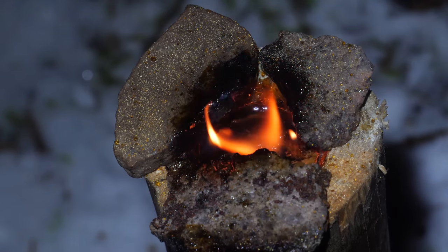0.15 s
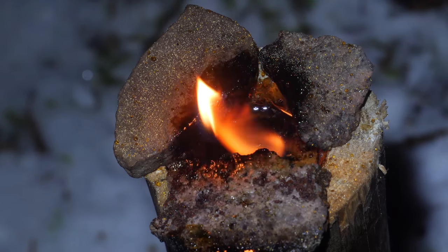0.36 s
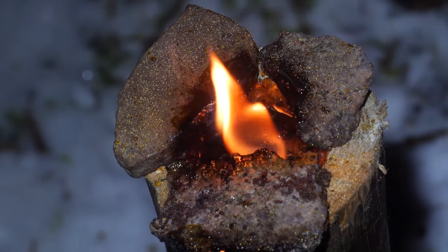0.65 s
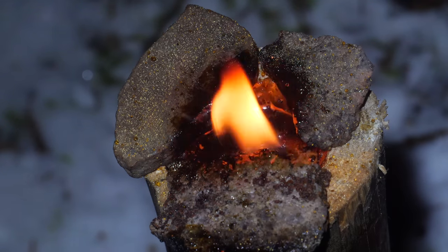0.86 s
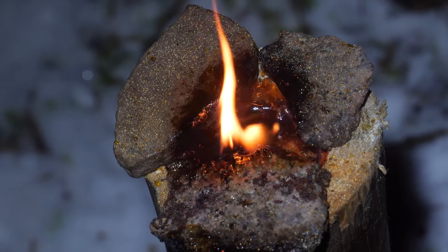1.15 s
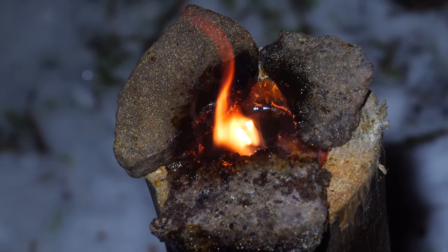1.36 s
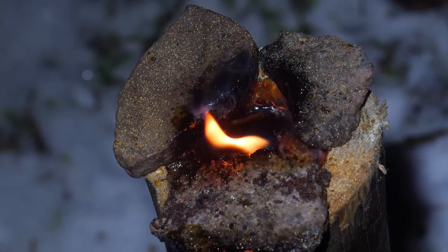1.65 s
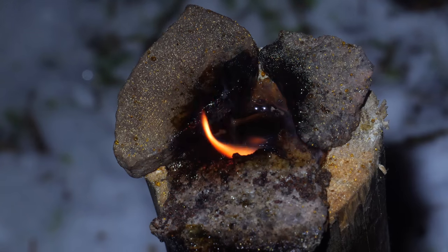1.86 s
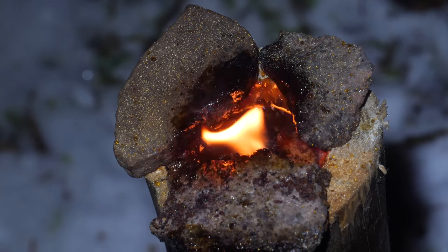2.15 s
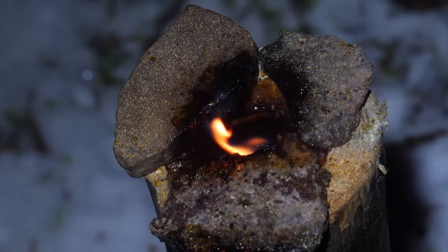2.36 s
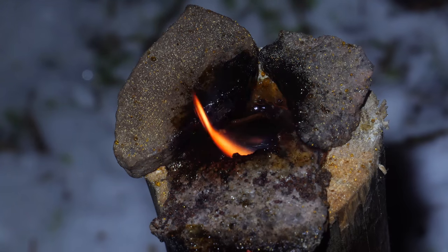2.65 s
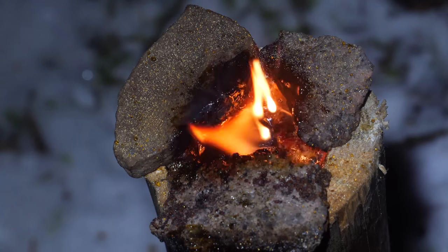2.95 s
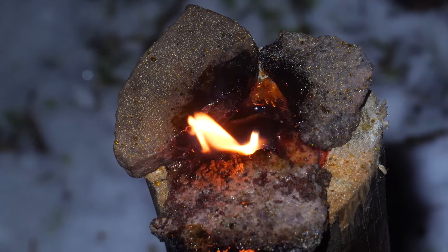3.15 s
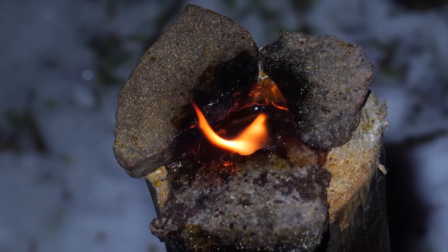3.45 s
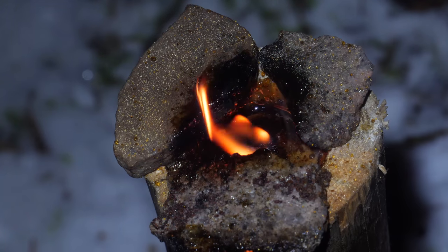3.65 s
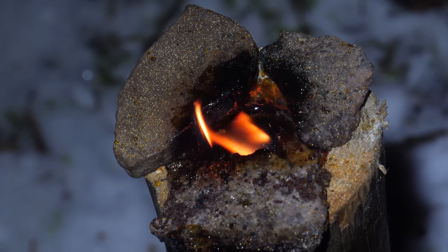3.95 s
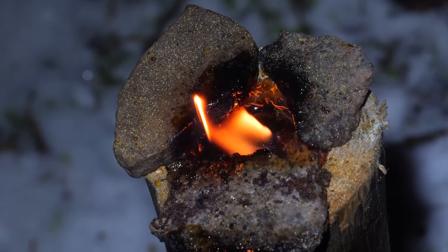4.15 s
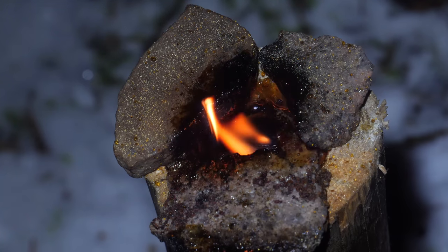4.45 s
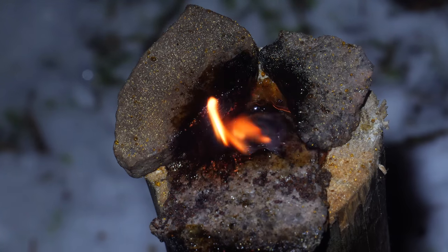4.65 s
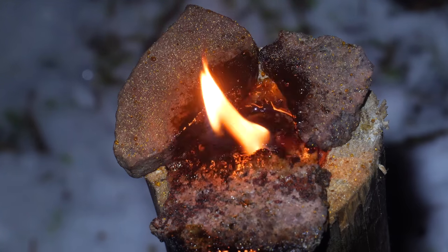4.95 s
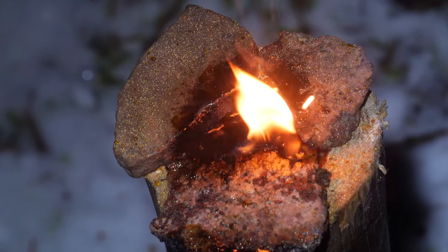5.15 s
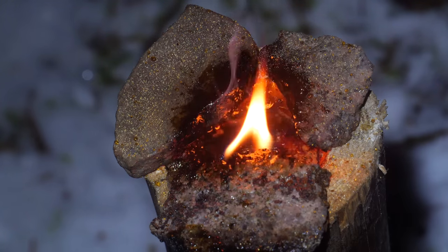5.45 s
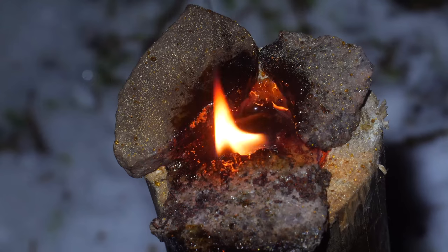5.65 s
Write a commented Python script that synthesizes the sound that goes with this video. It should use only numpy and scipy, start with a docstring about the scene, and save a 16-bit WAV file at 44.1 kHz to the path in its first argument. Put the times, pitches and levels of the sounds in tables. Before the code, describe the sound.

Quiet, dry crackles and sharp little pops from burning resin on a log, twice thickening into a brief sizzling flurry.

```python
"""A still, snowy forest; the microphone is close to a small flame boiling resin among stones on a log.
From the start, tiny bursts sizzle over faint air and a far hum, and gas pockets burst as sharp pops,
each thrown back by stones, log and ground within about 6 ms. From 0.5 s the flame puffs now and then.
Near 1 s the resin boils over amid a flurry of pops, then calms. The hum is strongest around 3 s.
Just after 5 s comes a second flurry with a softer, longer spurt, while the hum fades."""
import sys
import numpy as np
from scipy import signal
from scipy.fft import rfft, irfft
from scipy.io import wavfile

SR = 44100
rng = np.random.default_rng(int(sys.argv[2]) if len(sys.argv) > 2 else 0)


def dump_mix(stems):
    """Bounce the given channels to the path in sys.argv[1] as a 16-bit WAV at rate SR."""
    frames = np.atleast_2d(stems).T  # one column per channel
    limited = np.clip(frames, -1, 1)  # hard clip at full scale
    pcm = np.round(limited * 32767).astype(np.int16)
    wavfile.write(sys.argv[1], SR, pcm)


N = 256662

# Colour of still air and microphone hiss: (frequency [Hz], relative level [dB])
AIR_SPECTRUM = [(20, -3.5), (50, 0.5), (120, -1), (210, 4), (330, -5), (900, -13.5), (2000, -18.5),
                (4000, -24.5), (9000, -24), (14500, -19.5), (16500, -29)]
# Swell of the far hum: (time [s], level [dB])
HUM_LEVELS = [(0, -86), (1.3, -87.5), (1.7, -83), (3.1, -78), (3.6, -97), (4.3, -82.5), (5.82, -101.5)]
# Colour of one bursting gas pocket: (frequency [Hz], relative level [dB])
BURST_SPECTRUM = [(100, -30.5), (300, -14.5), (1000, 1.5), (2000, 3), (3000, 11.5), (4000, 14), (6000, 12),
                  (7500, 11.5), (9000, -1.5), (10500, 0), (13000, -10), (16500, -14.5)]
# The resin boils over: (start [s], sizzle level at the source [dB], length [s])
BOIL_OVERS = [(0.937, -38, 0.06), (5.074, -50, 0.19)]
# Bounces off log, stones and ground: (delay [ms], signed gain [ratio])
NEAR_ECHOES = [(.59, .04), (.76, .08), (1.04, .09), (1.13, .05), (1.38, -.05), (1.68, -.09), (1.95, -.07),
               (2.74, -.055), (2.93, .1), (3.29, .045), (3.76, .04), (4.01, .035), (4.44, -.075),
               (4.65, -.045), (5.17, .05), (5.4, .08), (5.69, -.025), (6.17, -.025)]
# Ringing air between the stones: (frequency [Hz], resonance gain [dB], time to fall 60 dB [s])
HOLLOW_MODES = [(466, 4.5, 0.015), (1091, 0, 0.032), (1642, 2.5, 0.014)]
# Larger gas pockets: (time [s], body level at the source [dB], thump re body [dB], tick re body [dB])
GAS_POPS = [(0.039, -24.0, -12.5, -21), (0.0473, -38.5, -14, -20), (0.0509, -38.5, -22, -14),
            (0.0847, -32, -17.5, -31), (0.1099, -40.5, -15, -19), (0.1254, -40.0, -13.5, -9),
            (0.1821, -33.0, -18, -19), (0.2503, -49, -12, -38), (0.278, -43.5, -14, -12),
            (0.28, -45.0, -19, -10), (0.2911, -41.5, -19, -16), (0.3016, -24, -19, -15.5),
            (0.3851, -38.5, -18, -26), (0.397, -47, -14, -17), (0.4008, -38, -14, -26),
            (0.4616, -31.0, -17, -15.5), (0.4867, -36, -21, -15), (0.5057, -44.5, -9, -17),
            (0.5384, -40.0, -13, -13), (0.5921, -15, -19, -15), (0.6058, -39.5, -10, -16),
            (0.6599, -39.5, -17, -15), (0.667, -42.5, -9, -24), (0.7027, -30.5, -19.5, -15.5),
            (0.7372, -37.5, -11.5, -18), (0.8419, -49.5, -22, -23), (0.8687, -46.5, -12.5, -13),
            (0.89, -46.5, -21, -24), (0.9212, -38.5, -2.5, -34), (0.9337, -29.5, -11, -18),
            (0.9476, -23.5, -21, -15), (0.9514, -24.5, -12.5, -18), (0.9564, -18, -17, -17),
            (0.9598, -20, -12.5, -12), (0.9699, -15.0, -12.5, -16), (0.9965, -35, -6, -17),
            (1.0097, -48.0, -17, -7), (1.0133, -55, -21, -7), (1.0284, -50, -22, -34),
            (1.0363, -44, -28, -16), (1.0483, -49, -22, -13), (1.0519, -22.5, -13, -34),
            (1.0539, -31.5, -19, -13), (1.0593, -20, -16.5, -14.5), (1.0626, -29.5, -18, -17),
            (1.084, -37, -28, -18), (1.0922, -25, -16, -34), (1.1029, -18.5, -15.5, -15),
            (1.118, -31, -15, -30), (1.1254, -30.0, -20, -31), (1.1375, -31.5, -22, -15),
            (1.1538, -42.0, -16, -13), (1.1596, -17.5, -15, -30), (1.1854, -37, -17, -7),
            (1.193, -37.5, -6, -19), (1.2142, -17.5, -22.5, -33), (1.238, -45, -20, -6),
            (1.2425, -36.5, -7, -18), (1.2539, -47.0, -13, -15), (1.2594, -43, -9, -14),
            (1.268, -49, -8, -9), (1.2924, -35.5, -16, -13), (1.3096, -46, -18, -8),
            (1.3208, -40, -19, -20), (1.3287, -37.0, -21, -14), (1.336, -42, -20, -10),
            (1.3755, -37.5, -11.5, -19), (1.382, -46, -19, -15), (1.3888, -27.5, -17, -6),
            (1.4162, -32.5, -16.5, -20), (1.4534, -40, -24, -12), (1.464, -47, -18, -1),
            (1.4693, -39, -11.5, -11), (1.521, -30.5, -20, -13), (1.5488, -27, -21, -16),
            (1.5768, -38.5, -12.5, -40), (1.608, -47, -26, -12), (1.6341, -47, -22, -21),
            (1.6497, -45.5, -14, -29), (1.6763, -42.0, -23, -27), (1.6902, -22.5, -20, -31),
            (1.7138, -29.5, -23, -20), (1.7776, -44.5, -13, -15), (1.8816, -43.5, -28, -13),
            (1.9161, -45, -21, -8.5), (2.041, -47.5, -19, -7), (2.1084, -28.5, -18, -35),
            (2.1971, -45.5, -11, -13), (2.229, -49, -20, -16), (2.2633, -39.5, -20, -9.5),
            (2.2761, -39.5, -12.5, -13), (2.3172, -32.0, -21.5, -14), (2.362, -43.5, -14.5, -13),
            (2.458, -33.5, -20, -18), (2.5544, -34.0, -19.5, -12.5), (2.6058, -48, -19, -12),
            (2.628, -45.5, -13, -25), (2.6789, -23.5, -20.5, -27), (2.7323, -32.5, -19, -7.5),
            (2.7407, -46, -29, -5), (2.7713, -37.5, -18.5, -15), (2.9298, -40, -32, -18),
            (2.9633, -31.5, -16, -13), (2.9708, -21.0, -22, -14.5), (3.0073, -26, -12.5, -13),
            (3.0651, -33, -17, -18), (3.091, -47.5, -19, -24), (3.1012, -41, -14, -14),
            (3.112, -43.5, -1, -22), (3.1561, -21.5, -18.5, -22), (3.172, -36, -10, -22),
            (3.1785, -43.5, -15, -18), (3.1824, -41, -13, -25), (3.2028, -38.5, -18, -17),
            (3.2075, -25, -18, -24), (3.2369, -31, -16.5, -17), (3.2943, -39, -24, -19),
            (3.4446, -44.5, -21, -12), (3.4496, -29, -19, -16), (3.4639, -40, -16, -9),
            (3.4663, -26, -22.5, -12), (3.4713, -23.0, -15, -17), (3.4843, -34.5, -18, -5),
            (3.525, -42, -12.5, -20), (3.6071, -38.5, -17, -11), (3.6313, -39, -17.5, -13),
            (3.6892, -36, -15, -16), (3.7452, -49.5, -15, -13), (3.757, -38.5, -33, -22),
            (3.7965, -48.5, -22, -7), (3.8578, -39.5, -28, -26), (3.8814, -28, -13.5, -39),
            (3.8938, -39, -16, -26), (3.9796, -46.5, -17, -24), (3.9936, -27.5, -15, -16),
            (4.0096, -35.0, -16, -20), (4.0204, -42, -14, -13), (4.0699, -48.5, 1, -41),
            (4.1133, -43, -22, -9), (4.1243, -34.5, -12.5, -22), (4.1518, -41.5, -7.5, -38),
            (4.1687, -24.5, -10, -31), (4.2222, -28.5, -16, -17.5), (4.3381, -25.0, -22, -17),
            (4.4897, -30.5, -10.5, -32), (4.5136, -38.5, -8.5, -6.5), (4.6718, -40.5, -9, -38),
            (4.6748, -19.5, -11.5, -20), (4.7031, -39, -20, -5), (4.7071, -44, -14, -16),
            (4.7121, -44, -13, -6), (4.7594, -47, -9, -12), (4.7954, -39, -6, -11.5),
            (4.7984, -39.5, -28, -24), (4.8288, -26, -11.5, -50), (4.8488, -36.5, -15, -8.5),
            (4.8546, -31, -12, -31), (4.865, -39.5, -9, -16), (4.943, -42, -19, -32),
            (4.9559, -29, -8.5, -26), (4.9779, -29, -17, -27), (4.9871, -37, -16, -18),
            (4.9938, -30, -16, -19), (4.9987, -28.5, -24, -27), (5.0194, -35.5, -6.5, -19),
            (5.034, -37, -17, -17), (5.048, -36.5, -12.5, -17), (5.0829, -16.5, -14.5, -28),
            (5.0934, -21.5, -11, -14), (5.1019, -32, -5, -12), (5.1051, -39, -10, -26),
            (5.1093, -37, -7, -24), (5.1137, -18.5, -13, -29.5), (5.1267, -15.5, -14, -14),
            (5.1422, -25.0, -14, -20), (5.145, -37, -16, -24), (5.1519, -15.5, -10.5, -16.5),
            (5.1668, -36, -4, 5), (5.1673, -23.0, -9, -22), (5.1714, -27, -11, -18), (5.1839, -29, -11, -8),
            (5.1977, -28, -15, -21), (5.202, -35.0, -12, -5), (5.2093, -23.5, -15.5, -11),
            (5.2173, -32.5, -15, -24), (5.2213, -28.5, -15, -24), (5.2384, -46, -5, 5),
            (5.25, -37.5, -12, -25), (5.2521, -46, 2, -4), (5.2555, -33.5, -14, -6),
            (5.272, -46.0, -22, -19), (5.2886, -38, -19, -21), (5.2986, -34, -13, -22),
            (5.3018, -31.0, -12, -13), (5.3156, -28.0, -13, -24), (5.3348, -43, -17, -27),
            (5.3464, -47, -14, -14), (5.3716, -25.5, -16, -37), (5.38, -24.0, -16.5, -13.5),
            (5.3961, -47, -15, -28), (5.4009, -50, -13, -29), (5.411, -34, -17, -9),
            (5.4319, -38, -18, -24), (5.4586, -45, -14, -15), (5.4627, -47, -11, -20),
            (5.4738, -50, -28, -11), (5.4765, -41.5, -17, -15), (5.4994, -32.5, -19.5, -12.5),
            (5.5449, -45.5, -11, -28), (5.5829, -31.5, -18.5, -9), (5.5906, -29, -17.5, -23),
            (5.6407, -40.0, -18, -18), (5.743, -25.5, -16.5, -15.5), (5.783, -43, -21, -12),
            (5.8005, -31.5, -15.5, -27), (5.8112, -37.0, -23, -42)]
# Puffs and spits of gas: (time [s], peak level [dB], pitch [Hz], length [s])
GAS_PUFFS = [(.54, -56.5, 980, 0.0074), (0.594, -54, 109, 0.014), (0.92, -47.5, 390, 0.003),
             (0.964, -48, 110, 0.022), (0.982, -50.5, 422, 0.017), (1.16, -55, 503, 0.033),
             (1.157, -36, 1720, 0.0057), (1.19, -52, 500, 0.013), (1.964, -62, 75, 0.017),
             (1.965, -69, 520, 0.013), (2.434, -55.5, 91, 0.0076), (3.041, -55, 132, 0.0075),
             (3.112, -42, 1560, 0.0034), (3.179, -55, 950, 0.0066), (3.447, -56, 388, 0.01),
             (3.86, -64, 91.5, 0.017), (4.773, -59.5, 111, 0.027), (4.776, -52, 800, 0.0046),
             (5.102, -52.5, 145, 0.061), (5.149, -51.5, 422, 0.037), (5.297, -53.5, 450, .02),
             (5.375, -54.5, 270, 0.018)]
# Faint difference between left and right by frequency: (frequency [Hz], side re middle [dB])
SIDE_LEVELS = [(60, -35), (240, -37.5), (950, -54), (3770, -36), (15000, -30)]

LEAD = 64  # samples kept ahead of a pulse
SIMMER_DB = -81.5  # the sizzle at its calmest


def gain_of(db):
    """Decibels as an amplitude factor."""
    return 10 ** (np.asarray(db) / 20)


def unit_rms(x):
    """The signal scaled to an RMS of 1."""
    return x / np.sqrt(np.mean(x ** 2) + 1e-20)


def spectrum_gain(points, hz):
    """Gain along a dB curve on a log frequency axis."""
    corner_hz, db = np.transpose(points)
    return gain_of(np.interp(np.log(hz + 1), np.log(corner_hz + 1), db))


def coloured_noise(gain):
    """Steady noise with the given gain at each frequency."""
    return unit_rms(irfft(rfft(rng.standard_normal(N)) * gain, N))


def forest():
    """Still air and microphone hiss, with a far hum that swells and wavers in pitch."""
    air_db, hum_hz, waver_hz = -74.5, 65.2, 1.1
    hz = np.fft.rfftfreq(N, 1 / SR)
    air = coloured_noise(spectrum_gain(AIR_SPECTRUM, hz))
    drift = coloured_noise(1 / (1 + (hz / 3.1) ** 2))
    hum = np.sqrt(2) * np.sin(2 * np.pi * np.cumsum(hum_hz + waver_hz * drift) / SR)
    hum_db = np.interp(np.arange(N) / SR, *np.transpose(HUM_LEVELS))
    return gain_of(air_db) * air + gain_of(hum_db) * hum


def burst_bands():
    """One gas pocket's pressure pulse, split low to high into thump, body, edge and tick of peak 1."""
    rise_hz = 4600  # a pocket needs a moment to open, which rounds the pulse above this
    crossovers_hz = (2368, 6140, 9600)
    hz = np.fft.rfftfreq(2048, 1 / SR)
    gain = spectrum_gain(BURST_SPECTRUM, hz)
    sudden = np.log(gain) + (hz / rise_hz) ** 2  # the colour without the rounded opening
    mirrored = np.r_[sudden, sudden[-2:0:-1]]
    phase = -signal.hilbert(mirrored).imag[:len(hz)]  # the shortest pulse of that colour
    thump, below_edge, below_tick = (1 / (1 + (hz / f) ** 12) for f in crossovers_hz)
    shares = np.array([thump, below_edge - thump, below_tick - below_edge, 1 - below_tick])
    bands = irfft(-gain * np.exp(1j * phase) * shares)
    bands = np.roll(bands, LEAD, axis=1)[:, :8 * LEAD]
    return bands / abs(signal.hilbert(bands)).max(axis=1)[:, None]


def bursts(at, size, thump_db, tick_db):
    """Gas pockets burst at the given samples, each with its own balance of the four bands."""
    edge_db = -0.5 + 0.54 * tick_db  # a sharp burst has more tick, and its edge follows
    body_db = np.zeros_like(size)
    trains = np.zeros((4, N))
    np.add.at(trains, (slice(None), at), size * gain_of([thump_db, body_db, edge_db, tick_db]))
    bands = burst_bands()
    crest = abs(signal.hilbert(bands[1])).argmax()
    return signal.oaconvolve(trains, bands, axes=1).sum(0)[crest:][:N]


def boil():
    """How hard the resin boils: a calm simmer, sudden spurts and their slow aftermath."""
    surge_s, spurt_fall_db = 0.025, 23
    after_db, calming_db_per_s = -65.5, 38.5
    level = np.full(N, gain_of(SIMMER_DB))
    for start, db, length in BOIL_OVERS:
        since = np.maximum(np.arange(N) / SR - start, 0)
        surge = np.minimum(since / surge_s, 1) ** 2
        spurt = gain_of(db - spurt_fall_db * since / length)
        aftermath = gain_of(after_db - calming_db_per_s * since)
        level += surge * (spurt + aftermath)
    return level


def sizzle():
    """Countless tiny bursts that swell and sharpen as the resin boils, and a few stray larger ones."""
    fine_per_s, stray_per_s, stray_db = 1000, 22, -60
    chance, scale = rng.random(N), rng.exponential(1, N)
    thump, sharpness = rng.standard_normal((2, N))
    level = boil()
    fine = gain_of(4.05 * np.minimum(scale, 4)) * (chance < fine_per_s / SR)
    fine = level * unit_rms(fine) / np.linalg.norm(burst_bands()[1])
    stray = gain_of(stray_db + 3.23 * np.minimum(scale, 3)) * (chance > 1 - stray_per_s / SR)
    above_simmer_db = 20 * np.log10(level) - SIMMER_DB
    tick_db = -17 + 5.6 * sharpness + 0.12 * above_simmer_db
    return bursts(np.arange(N), fine + stray, thump_db=-15 + 6.8 * thump, tick_db=tick_db)


def stone_hollow(x):
    """On the way to the microphone: a stone wall, single echoes, ringing air and a faint scatter."""
    wall_ms, wall_gain = 0.2455, 0.35  # the stone just behind the flame
    scatter_db, scatter_t60_s = -15.5, 0.047  # bark and twigs farther off
    t = np.arange(SR // 10) / SR
    wall = np.sinc(t[:64] * SR) + wall_gain * np.sinc((t[:64] - wall_ms / 1000) * SR)
    rough = signal.lfilter([1, -.5], 1, rng.standard_normal(len(t)))  # small surfaces return treble best
    scatter = rough * gain_of(-60 * t / scatter_t60_s) * (t > .0006)
    path = gain_of(scatter_db) * scatter / np.linalg.norm(scatter)
    path[0] = 1  # the direct sound
    for ms, gain in NEAR_ECHOES:
        path += gain * np.sinc((t - ms / 1000) * SR)
    for hz, db, t60 in HOLLOW_MODES:
        decay = gain_of(-60 * t / t60)
        path += gain_of(db) * decay * np.cos(2 * np.pi * hz * t) / decay.sum() * 2
    return signal.oaconvolve(x, np.convolve(path, wall))[:N]


def pops():
    """Larger pockets burst, each at its own spot and so tinted by a close bounce of its own."""
    max_bounce_ms, max_bounce_gain = .35, 0.29
    times, db, thump_db, tick_db = np.transpose(GAS_POPS)
    lateness, strength = rng.random((len(times), 2)).T
    bounce_times = times + (.2 + .8 * lateness) * max_bounce_ms / 1000
    bounce_size = gain_of(db) * max_bounce_gain * (2 * strength - 1)
    at = np.round(np.r_[times, bounce_times] * SR).astype(int)
    return bursts(at, np.r_[gain_of(db), bounce_size], np.tile(thump_db, 2), np.tile(tick_db, 2))


def puffs():
    """The flame puffs gas: short gusts of noise around a loose pitch, quick to rise, slower to die."""
    out = np.zeros(N)
    t = np.arange(SR // 5) / SR
    for start, db, hz, length in GAS_PUFFS:
        band = signal.butter(2, [max(0.71 * hz - 50, 20), 1.34 * hz + 90], "band", fs=SR)
        noise = signal.lfilter(*band, rng.standard_normal(2 * len(t)))[len(t):]
        age = t / length * 3
        gust = noise * age * np.exp(-age)
        span = out[round(start * SR):][:len(t)]
        span += (gain_of(db) * gust / abs(gust).max())[:len(span)]
    return out


def scene():
    """All comes from in front of the microphone; the sound is nearly mono and centred."""
    middle = stone_hollow(pops() + sizzle()) + puffs() + forest()
    width = spectrum_gain(SIDE_LEVELS, np.fft.rfftfreq(N, 1 / SR))
    side = irfft(rfft(middle) * width * 1j, N)  # a quarter turn of phase: neither side is louder
    return np.array([middle + side, middle - side])


def record(dry):
    """The recorder cuts off the highest treble."""
    cutoff_hz = 16800
    lowpass = signal.firwin(511, cutoff_hz, window=("kaiser", 9), fs=SR)
    return signal.oaconvolve(dry, lowpass[None], "same")


dry = scene()
out = record(dry)
dump_mix(out)
```